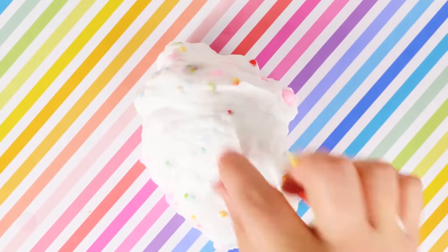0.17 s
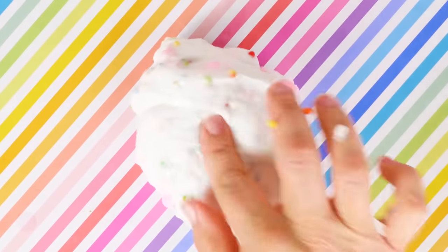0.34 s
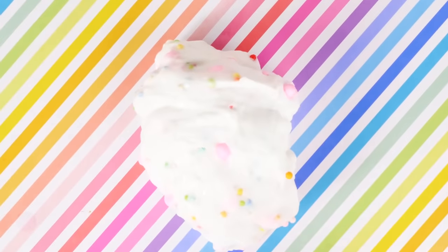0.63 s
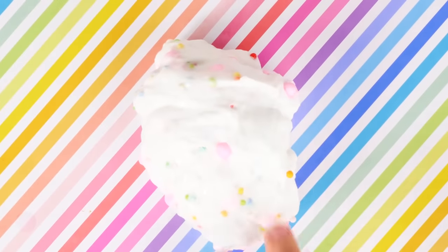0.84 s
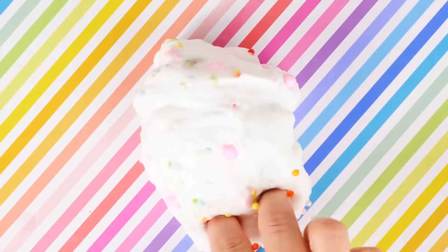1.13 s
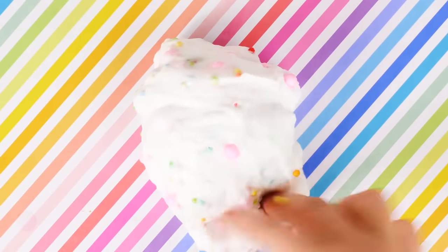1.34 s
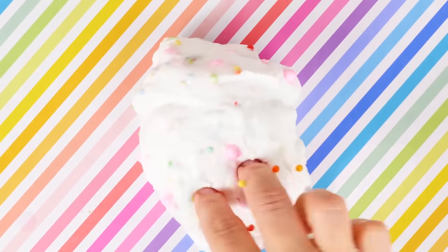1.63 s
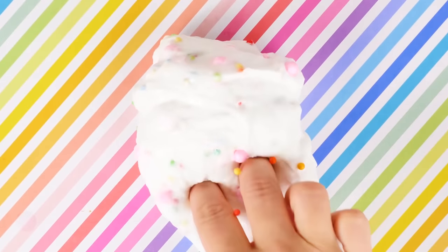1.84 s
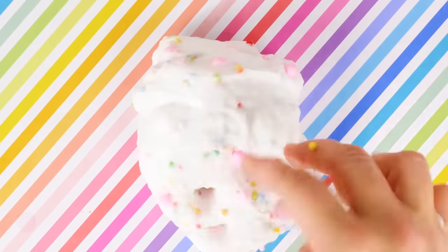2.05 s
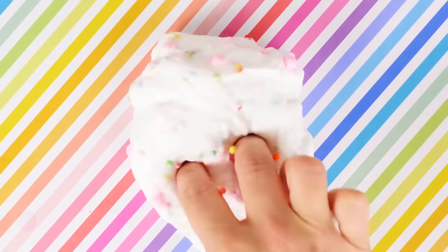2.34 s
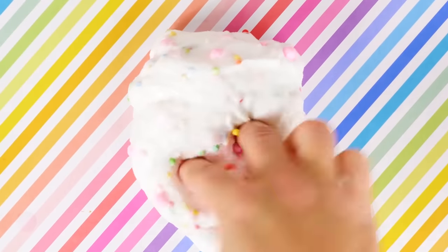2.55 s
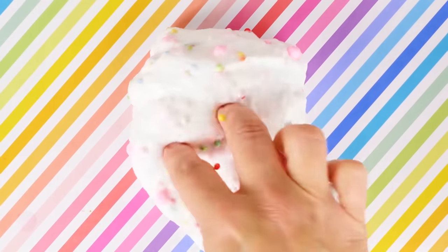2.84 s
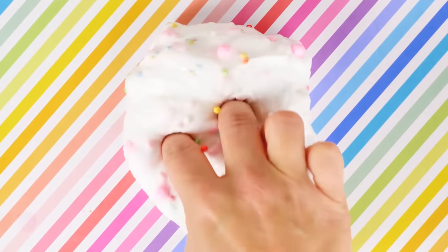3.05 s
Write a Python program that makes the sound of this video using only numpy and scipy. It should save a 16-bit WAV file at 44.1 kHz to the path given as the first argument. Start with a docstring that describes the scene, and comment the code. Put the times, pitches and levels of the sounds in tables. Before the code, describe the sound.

Fluffy slime is poked by fingers, close to the microphone in a small, live room. Soft rubbing and tiny bubble ticks lead into four short bursts of sticky snaps, air pops and soft thumps, the last one strongest.

```python
"""Fingers poke fluffy slime on a table, close to a microphone in a small, live room with a faint hum.
First the lump rubs softly, its skin peels and tiny bubbles tick. From 1.1 s the sticky film tears in
bursts of snaps, air pockets pop as damped resonators, foam crackles and the hole closes with a thump.
The fingers press or pull free again near 1.4 s, 2.1 s (mostly thumps) and 2.7 s (the strongest tear),
with ticks and crackle in between. The room rings out, and a last faint rub follows."""
import sys
import numpy as np
from scipy import signal
from scipy.fft import rfft, irfft
from scipy.io import wavfile

SR = 44100
rng = np.random.default_rng(int(sys.argv[2]) if len(sys.argv) > 2 else 0)


def wav_record(signal):
    """Record a signal, one row per channel, as 16-bit PCM in the file named by sys.argv[1]."""
    frames = np.transpose(np.atleast_2d(signal))
    bounded = np.clip(frames, -1, 1)
    # unit amplitude maps onto the largest positive 16-bit level
    quanta = np.round(bounded * 32767).astype(np.int16)
    wavfile.write(sys.argv[1], SR, quanta)


N = 141120  # 3.2 s

# spectrum of the room's hum and hiss: f/Hz, relative level/dB
HUM_SPECTRUM = [(15, -78), (25, -48), (48, -32), (59, -16), (80, -18), (99, -6.5), (137, 3), (153, 0),
                (175, -13), (256, -15), (293, -15), (439, -11.5), (476, -11.5), (591, -13.5), (695, -4),
                (988, -17), (1100, -12.5), (1190, -18.5), (1400, -15.5), (1700, -18), (2480, -17.5),
                (3250, -24.5), (7510, -26), (11000, -27), (16000, -36.5)]
# the lump dragged and kneaded: centre t/s, Gaussian width/s, level/dB, f/Hz, bandwidth/Hz
RUB_SWELLS = [(.32, .055, -61, 85, 28), (.42, 0.034, -70, 3470, 6100), (1.939, 0.035, -62.5, 780, 1200),
              (2.55, 0.079, -64, 890, 1790), (2.56, .04, -68, 157, 79), (3.181, .012, -60, 162, 201)]
# skin peeling off the surface: centre t/s, Gaussian width/s, level/dB, f/Hz
PEEL_SWELLS = [(.43, .04, -67, 11900), (.494, 0.012, -60.5, 11300), (.4962, 0.0014, -49, 9800),
               (1.07, 0.024, -68, 11800), (1.18, 0.034, -70, 12000), (1.743, 0.0035, -69, 13000),
               (1.945, 0.0038, -69, 8250), (2.067, 0.0045, -56, 10500), (2.39, .01, -68, 11000),
               (2.683, 0.0036, -53, 9500)]
# tiny surface bubbles: t/s, level/dB, f/Hz
BUBBLE_TICKS = [(.4802, -42, 12700), (0.4962, -37.5, 9600), (1.1072, -39, 13400), (1.142, -45, 10200),
                (1.1520, -46, 11000), (1.1653, -37, 12300), (1.1800, -50, 12500), (1.193, -41, 11000),
                (1.1948, -28.5, 11900), (1.197, -46, 11500), (1.234, -45, 9600), (1.4660, -38, 8500),
                (1.7416, -43, 12800), (1.8261, -46, 10600), (1.941, -42.5, 7900), (2.4524, -48, 9200),
                (2.549, -47, 7150)]
# film tearing: t/s, hold/s, decay/s, squelch level/dB, its low f/Hz, its high f/Hz,
# crack level/dB, fizz level/dB
FILM_TEARS = [(1.107, 0.0016, 0.0044, -41.5, 860, 4580, -63, -59),
              (1.217, 0.0025, .005, -58.5, 1100, 4650, -68, -72),
              (1.193, 0.0022, 0.0017, -55, 1500, 4700, -56, -58),
              (1.246, 0.0023, 0.0036, -53, 844, 4300, -68, -61),
              (1.266, 0.0012, 0.0016, -55, 1000, 4370, -70, -71),
              (1.28, 0.0018, 0.0018, -62, 990, 4400, -69, -73),
              (1.255, 0.051, 0.013, -61, 836, 3660, -77, -87),
              (1.4296, 0.0025, 0.0022, -51, 900, 2580, -63, -60),
              (1.4318, 0.0016, 0.0034, -37.5, 1170, 2180, -42.5, -39),
              (1.4412, .0019, 0.0013, -44, 990, 4500, -63, -34.5),
              (1.446, 0.0059, 0.0041, -48.5, 900, 2270, -56, -50),
              (1.4612, 0.0061, 0.0069, -49.5, 400, 2570, -57, -46.5),
              (1.469, 0.0072, 0.01, -51, 590, 4560, -59, -64),
              (2.0705, 0.0043, 0.0043, -47.5, 350, 3050, -52.5, -41.5),
              (2.0732, 0.00079, 0.00083, -44, 400, 4700, -60, -36.5),
              (2.0750, 0.0081, 0.0089, -46.5, 300, 3630, -74, -50),
              (2.095, .011, 0.0059, -50.5, 280, 3040, -54.5, -50),
              (2.6849, 0.0013, 0.0013, -37.5, 890, 4560, -35.5, -47),
              (2.689, 0.0018, 0.0076, -36.5, 990, 4400, -36, -35),
              (2.7152, .0041, 0.0052, -39, 130, 4700, -30.5, -32),
              (2.72, 0.0048, 0.0029, -29, 128, 4700, -26, -33),
              (2.7284, 0.0077, 0.012, -40, 150, 3430, -42, -53)]
# spectra of a tear's low, bright and highest parts: f/Hz, relative level/dB
SQUELCH_SPECTRUM = [(60, -16), (150, 1.5), (300, 0), (600, 1), (1000, -1), (1400, -2.5), (2400, -1),
                    (3300, -6), (4400, -2), (5300, -13.5), (16000, -37)]
CRACK_SPECTRUM = [(60, -40), (1000, -20), (2400, -8.5), (3500, -2), (6300, 2), (8500, 1.5), (10500, -2),
                  (13000, -30), (16000, -41)]
FIZZ_SPECTRUM = [(60, -48), (3000, -36), (6500, -18.5), (8300, -2.5), (10100, 3), (12000, -3.5),
                 (15000, -8.5), (16500, -27)]
# resonances of the hand's hollow and the table: f/Hz, bandwidth/Hz, gain/dB
HOLLOW_MODES = [(456, 59, 3), (652, 28, -1), (800, 34, -9), (1213, 38, -1), (1345, 35, -6), (1880, 60, -4),
                (2287, 33, 2), (3340, 75, -4), (4100, 140, -14), (4490, 91, -5.5), (5250, 79, -6),
                (6150, 140, 0.5), (6425, 81, 0.5), (7400, 94, -7), (8900, 49, -20)]
# air pockets bursting: t/s, level/dB, final f/Hz, decay/s, upward glide as a fraction of f
POCKET_POPS = [(1.1076, -31.5, 1580, 0.00077, 0.05), (1.4324, -25.5, 1377, .0013, .15),
               (1.4342, -32, 1830, .0014, 0.054), (1.4405, -45, 1150, 0.00085, 0.13),
               (1.4432, -37.5, 4100, 0.0016, .05), (1.4735, -45, 4240, 0.0038, 0.038),
               (2.1220, -49, 764, 0.01, 0.34), (2.6860, -27.5, 1265, 0.004, 0.082),
               (2.6880, -31, 1450, .0025, 0.04), (2.6865, -34, 4170, .004, .02),
               (2.7225, -29.5, 662, .009, .02), (2.7235, -32, 520, .007, .04),
               (2.7215, -33, 1190, 0.0061, 0.024), (2.7208, -26, 2320, 0.0063, .01)]
# fingers sinking into the foam: centre t/s, Gaussian width/s, level/dB
CRACKLE_SWELLS = [(1.22, .05, -53), (1.88, 0.041, -53), (2.44, .09, -55)]
# the hole closing and the lump slumping: t/s, level/dB, final f/Hz, decay/s
SLUMP_THUMPS = [(1.251, -54.5, 184, 0.03), (1.442, -43.5, 144, .034), (1.4620, -47, 391, 0.013),
                (1.4650, -48, 180, .02), (2.0700, -33.5, 164, 0.017), (2.0730, -47.5, 667, 0.0051),
                (2.0970, -35.5, 338, 0.01), (2.0990, -41, 658, 0.0092), (2.1091, -26, 191, 0.0054),
                (2.1120, -34.5, 430, 0.0041), (2.1080, -45.5, 867, 0.0075), (2.115, -35, 132, 0.025),
                (2.1200, -34, 293, 0.009), (2.1230, -41.5, 354.3, 0.023), (2.162, -46, 169, 0.02),
                (2.1600, -48, 335, .016), (2.6880, -36, 452, 0.0079), (2.6920, -27.5, 177.5, 0.016),
                (2.7170, -29, 196, 0.013), (2.7240, -30.5, 435, .007), (2.7310, -28, 220, 0.0074),
                (2.7380, -34, 147.7, 0.026), (2.7390, -29, 349, 0.01)]
# near reflections: delay/s, gain as a ratio
REFLECTIONS = [(.0016, 0.12), (.0029, 0.11), (.0045, .25), (.0091, 0.17)]
# reverberation time: f/Hz, T60/s
TAIL_T60 = [(120, 0.22), (400, 0.83), (1200, 1.01), (4000, .75), (7000, 0.72), (10000, 0.58), (15000, 0.43)]
# spectrum of the reverberation: f/Hz, level/dB
TAIL_SPECTRUM = [(120, -17), (400, -8), (700, -11.5), (1200, -4), (2400, -9.5), (4000, -5.5), (7000, -10),
                 (10000, -14.5), (15000, -14)]
# stereo width of the diffuse field and of the early scatter: f/Hz, side level/dB
DIFFUSE_SIDE = [(150, -53), (400, -20.5), (700, -12.5), (1300, -7), (4400, -5.5), (8500, -15),
                (14000, -2.5)]
SCATTER_SIDE = [(150, -55), (700, -23), (1300, -10.5), (4400, -14), (8500, -25), (14000, -8.5)]


def amp(db):
    """Amplitude grows tenfold for every 20 dB."""
    return 10 ** (np.asarray(db) / 20)


def unit(x):
    """Normalisation to an rms of 1."""
    return x / np.sqrt(np.mean(abs(x) ** 2) + 1e-20)


def read(points, hz):
    """Interpolation on a logarithmic frequency axis."""
    f, value = np.transpose(points)
    return np.interp(np.log(hz + 1), np.log(f + 1), value)


def add(mix, start, sound):
    """Superposition: a sound joins the mix at a start time in seconds."""
    part = mix[round(start * SR):][:len(sound)]
    part += sound[:len(part)]


def cut(x, hz, kind, order):
    """Maximally flat high-pass or low-pass filtering."""
    return signal.sosfilt(signal.butter(order, min(hz, .45 * SR), kind, fs=SR, output="sos"), x)


def tint(x, spectrum, size=4096):
    """Minimum-phase filtering of unit energy: no sound precedes its onset."""
    log_gain = np.log(amp(read(spectrum, abs(np.fft.fftfreq(size, 1 / SR)))))
    taps = np.fft.ifft(np.exp(np.conj(signal.hilbert(log_gain)))).real[:size // 2]
    return signal.fftconvolve(x, taps / np.linalg.norm(taps))[:len(x)]


def shape(x, spectrum):
    """Zero-phase filtering by a spectrum in dB."""
    return irfft(rfft(x) * amp(read(spectrum, np.fft.rfftfreq(len(x), 1 / SR))), len(x))


def resonate(x, hz, width):
    """Forced response of one damped resonator."""
    r = np.exp(-np.pi * width / SR)
    return 2 * signal.lfilter([1 - r], [1, -r * np.exp(2j * np.pi * hz / SR)], x + 1e-18).real


def band(x, hz, width):
    """Two resonators in cascade select a band, scaled to an rms of 1."""
    return unit(resonate(resonate(x, hz, width), hz, width))


def swell(centre, sigma, db):
    """A Gaussian envelope rises and falls smoothly."""
    t = np.arange(N) / SR
    return amp(db) * np.exp(-((t - centre) / sigma) ** 2 / 2)


def snaps(size, spread_db):
    """Dense impulses of random sign and uneven size sum to white noise."""
    signs = rng.choice([-1., 1.], size)
    return unit(signs * amp(spread_db * np.minimum(rng.exponential(1, size), 5)))


def room_hum(level_db=-63.5):
    """Stationary noise, strongest in the bass, is heard as hum and hiss; mid and side."""
    mid, side = (unit(shape(noise, HUM_SPECTRUM)) for noise in rng.standard_normal((2, N)))
    return amp(level_db) * np.array([mid, shape(side, DIFFUSE_SIDE)])


def rubs():
    """Friction noise: the table rumbles and the slime rustles as the lump is pushed."""
    return sum(swell(centre, sigma, db) * band(rng.standard_normal(N), hz, width)
               for centre, sigma, db, hz, width in RUB_SWELLS)


def peels(width_hz=5400):
    """Adhesion fails in tiny steps: an airy crackle swells and fades as skin unsticks."""
    unsticking = cut(snaps(N, spread_db=4), 7100, "highpass", order=5)
    return sum(swell(centre, sigma, db) * band(unsticking, hz, width_hz)
               for centre, sigma, db, hz in PEEL_SWELLS)


def ticks(rise_s=0.0001, decay_s=0.00037, glide=0.1, puff_gain=0.52):
    """Small cavities resonate high: each bursting bubble gives a few rising cycles and a puff."""
    out, t = np.zeros(N), np.arange(SR // 100) / SR
    envelope = (1 - np.exp(-t / rise_s)) * np.exp(-t / decay_s)
    sweep = 1 + glide * (.5 - np.exp(-t / decay_s))
    for start, db, hz in BUBBLE_TICKS:
        ring = np.sin(2 * np.pi * np.cumsum(hz * sweep) / SR)
        puff = band(rng.standard_normal(len(t)), hz, width=12000)
        add(out, start, amp(db) * envelope * (ring + puff_gain * puff))
    return cut(out, 1500, "highpass", order=2)


def tears(rise_s=0.00021, direct_gain=0.97):
    """Source and filter: the ripping film sheds snaps that excite the hand's hollow and the table."""
    film, t = np.zeros(N), np.arange(SR // 4) / SR
    for start, hold, decay, squelch_db, low_hz, high_hz, crack_db, fizz_db in FILM_TEARS:
        envelope = (1 - np.exp(-t / rise_s)) * np.exp(-np.maximum(t - hold, 0) / decay)
        squelch, crack, fizz = (tint(envelope * snaps(len(t), spread_db=2.5), spectrum)
                                for spectrum in (SQUELCH_SPECTRUM, CRACK_SPECTRUM, FIZZ_SPECTRUM))
        # the size of the gap sets the squelch's band
        squelch = cut(squelch, low_hz, "highpass", order=3)
        squelch = cut(squelch, high_hz, "lowpass", order=4)
        burst = amp(squelch_db) * unit(squelch) + amp(crack_db) * unit(crack) + amp(fizz_db) * unit(fizz)
        add(film, start, burst * np.sqrt(np.mean(envelope ** 2)))
    ringing = sum(amp(db) * resonate(film, hz, width) for hz, width, db in HOLLOW_MODES)
    return direct_gain * film + ringing


def cavities(rows, rise_cycles):
    """Damped oscillation: each air cavity rings, its frequency rising as it shrinks."""
    out, t = np.zeros(N), np.arange(SR // 4) / SR
    for start, db, hz, decay, glide in rows:
        fall = np.exp(-t / decay)
        cycles = np.cumsum(hz * (1 - glide * fall)) / SR
        rise = 1 - np.exp(-cycles / rise_cycles)
        add(out, start, amp(db) * rise * fall * np.sin(2 * np.pi * cycles))
    return out


def pops():
    """Impulse excitation: a bursting air pocket rings at its natural frequency."""
    return cavities(POCKET_POPS, rise_cycles=0.19)


def crackle(breaks_per_s=110, spread_db=3.5):
    """Shot noise: foam cells break one by one, at random, under the pressing fingers."""
    press = sum(swell(*row) for row in CRACKLE_SWELLS)
    breaks = rng.random(N) < breaks_per_s / SR
    sizes = amp(spread_db * np.clip(rng.standard_normal(N), -2, 2))
    return 2 * resonate(press * breaks * sizes, hz=10000, width=7800)


def thumps(glide=0.034):
    """Low, damped resonances build softly as the hole closes and the lump slumps on the table."""
    return cavities([(*row, glide) for row in SLUMP_THUMPS], rise_cycles=0.43)


def tail(build_s=0.0054):
    """A diffuse field builds up, then decays exponentially, each band at its own rate."""
    hz, t, noise = signal.stft(rng.standard_normal(SR), SR, nperseg=256)
    damping = np.log(1000) / read(TAIL_T60, hz)[:, None]
    fall = np.exp(-damping * t) * np.sqrt(2 * damping / SR)  # energy independent of T60
    bands = noise * fall * amp(read(TAIL_SPECTRUM, hz))[:, None]
    response = signal.istft(bands, SR, nperseg=256)[1][:SR]
    return response * (1 - np.exp(-(np.arange(SR) / SR / build_s) ** 2))


def room(x, swap_hz=70.48, scatter_s=0.0024):
    """Direct sound, near reflections and reverberation superpose; mid and side."""
    # two alternating tails keep the decay smooth
    phase = 2 * np.pi * swap_hz * np.arange(N) / SR
    mid = sum(signal.fftconvolve(x * share, tail())[:N] for share in (np.cos(phase), np.sin(phase)))
    for delay, gain in [(0.00013, 1), *REFLECTIONS]:  # the direct path comes first
        add(mid, delay, gain * x)
    scatter = rng.standard_normal(SR) * np.exp(-np.arange(SR) / SR / scatter_s)
    early_side = shape(signal.fftconvolve(x, scatter / np.linalg.norm(scatter))[:N], SCATTER_SIDE)
    late_side = shape(signal.fftconvolve(x, tail())[:N], DIFFUSE_SIDE)
    return np.array([mid, early_side + late_side])


def scene():
    """All sources add in the room; the sum and difference of mid and side give left and right."""
    # small pockets radiate no deep bass
    bursts = cut(tears() + pops() + thumps(), 103, "highpass", order=4)
    mid, side = room(bursts + ticks() + crackle() + peels() + rubs()) + room_hum()
    return np.array([mid + side, mid - side])


def record(dry, limit_hz=16200):
    """Finite bandwidth: the microphone rolls off the bass, then a low-pass limits the treble."""
    thin = cut(dry, 80, "highpass", order=2)
    lowpass = signal.firwin(511, limit_hz, window=("kaiser", 9), fs=SR)
    return signal.oaconvolve(thin, lowpass[None], "same")


dry = scene()
out = record(dry)
wav_record(out)
```